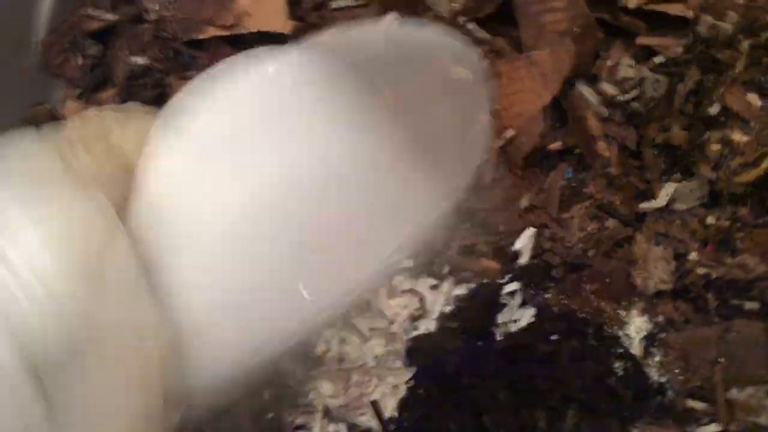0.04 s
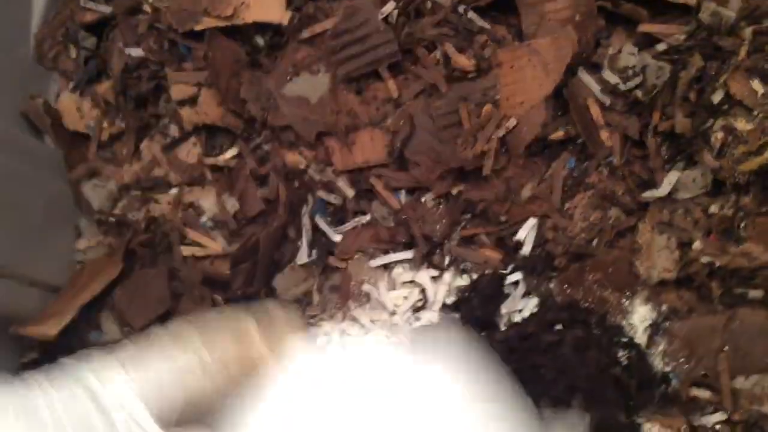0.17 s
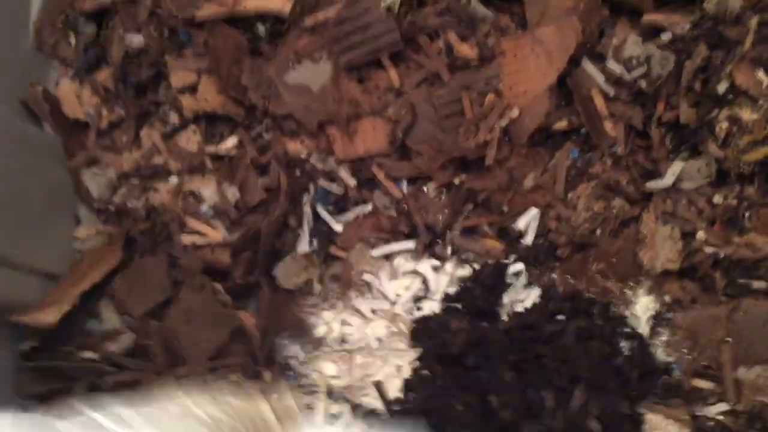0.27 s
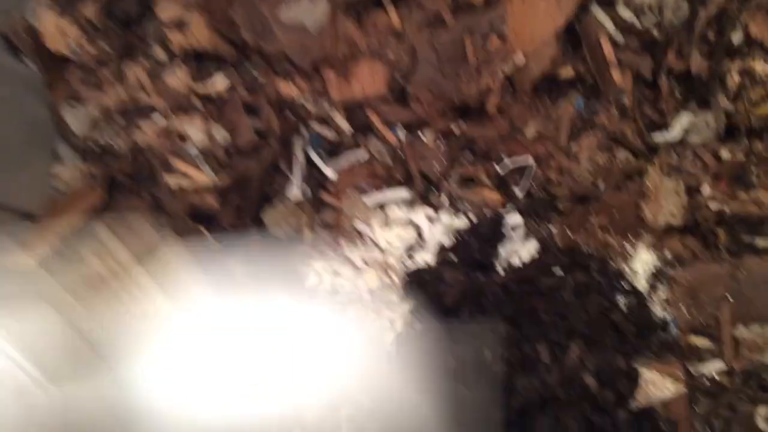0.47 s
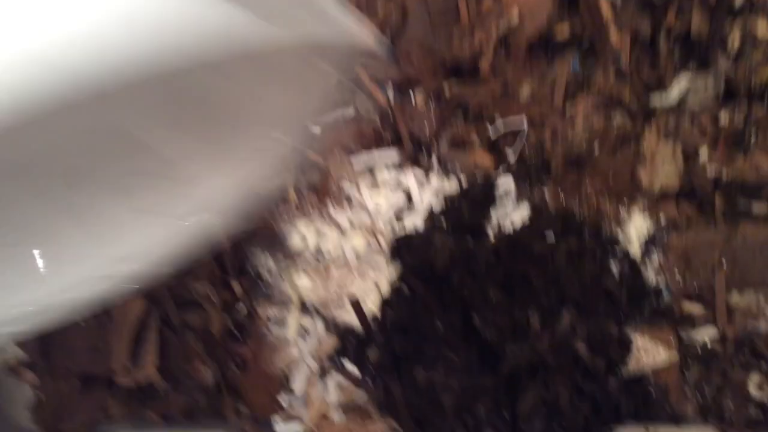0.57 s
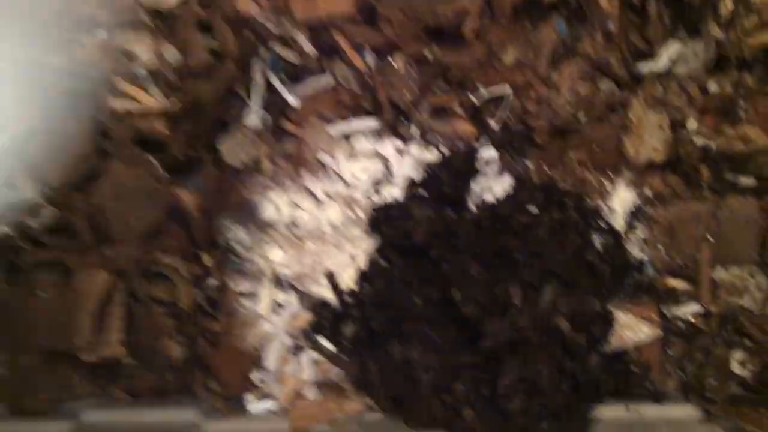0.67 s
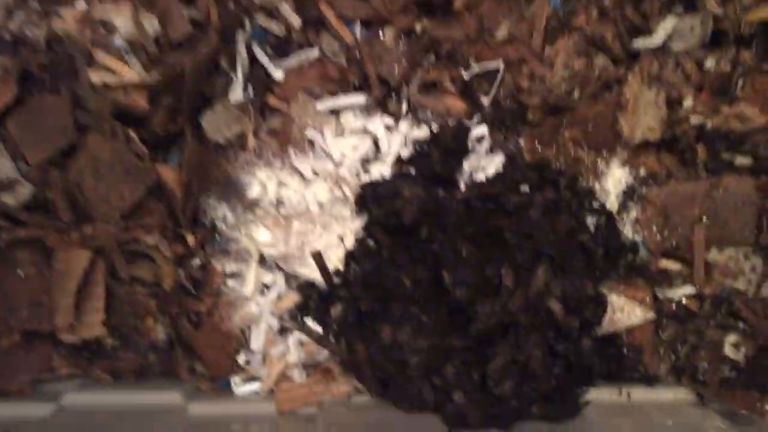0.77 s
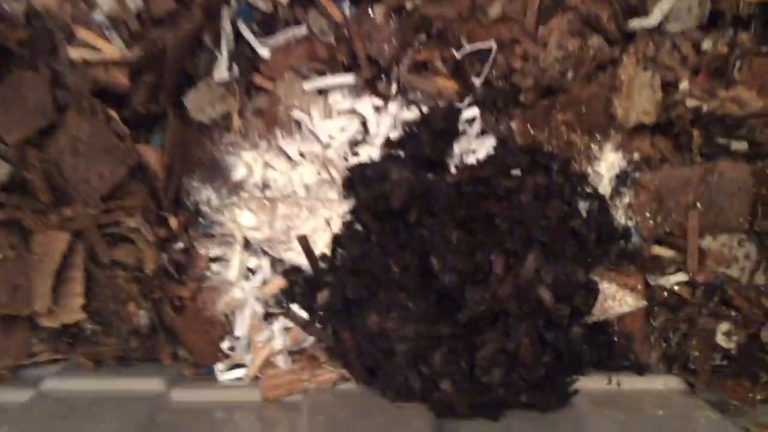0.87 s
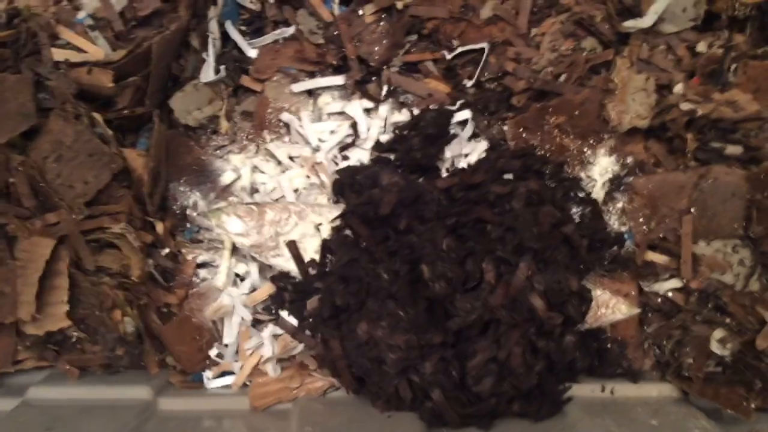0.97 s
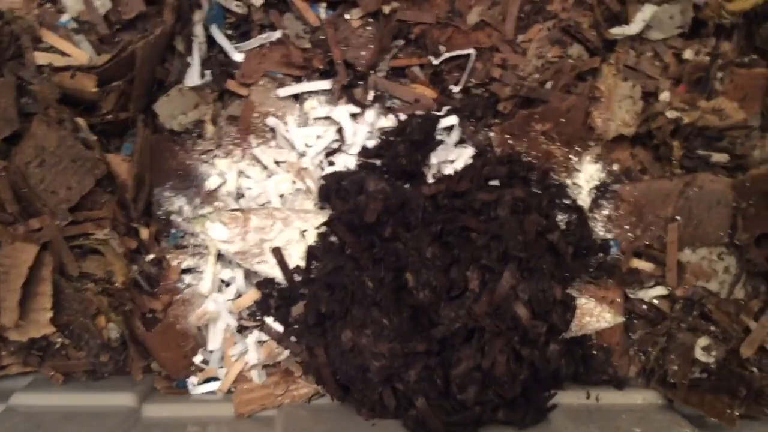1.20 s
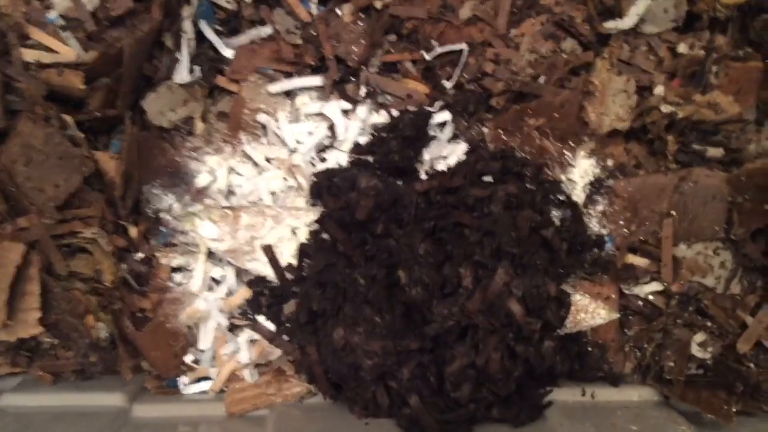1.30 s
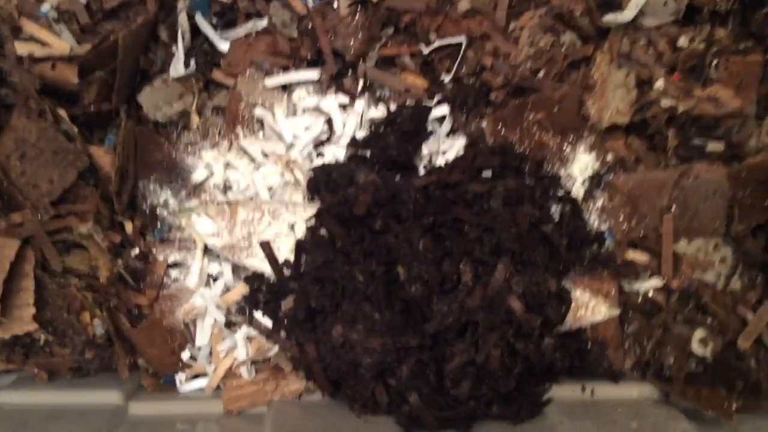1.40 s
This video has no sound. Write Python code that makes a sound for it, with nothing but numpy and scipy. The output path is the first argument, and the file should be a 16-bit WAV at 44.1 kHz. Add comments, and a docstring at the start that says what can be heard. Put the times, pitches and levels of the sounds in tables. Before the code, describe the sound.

Close, hard plastic knocks, three in quick succession, crack and boom through a large bin over faint rustling and hiss; after a short pause the bowl lands more distantly on a hard surface and rattles briefly indoors.

```python
"""A quiet hum, hiss and low rumble (filtered noise) run throughout; gloves and scraps rustle as dense random
grains, first softly on their own. After a faint lead-in a plastic bowl is knocked three times on the rim of a
large bin, close to the microphone, the last knock in two touches: each is a noise crack with decaying bowl
and bin modes. Last, again after a faint lead-in, the bowl is set down on a hard surface, where it bounces:
weaker cracks and modes. A small room answers with an echo of decaying noise bands."""
import sys
import numpy as np
from scipy import signal
from scipy.fft import rfft, irfft
from scipy.io import wavfile

SR = 44100
rng = np.random.default_rng(int(sys.argv[2]) if len(sys.argv) > 2 else 0)


def digitize_waveform(pressure):
    """Quantize a signal to 16-bit integers and store it at the path in sys.argv[1].

    Rows of a 2-D input are taken as channels; values are limited to [-1, 1].
    """
    field = np.atleast_2d(pressure).T
    bounded = np.clip(field, -1, 1)
    quanta = np.round(bounded * 32767).astype(np.int16)
    wavfile.write(sys.argv[1], SR, quanta)


def level_to_linear(level):
    """Convert decibel levels to linear amplitude factors, elementwise."""
    exponent = np.asarray(level, float) / 20
    return 10 ** exponent


N = 63945  # length in samples

# Spectrum of the hum and hiss: [f/Hz, relative level/dB]
HUM_SPECTRUM = [(24, -53), (40, -23.5), (118, -0.5), (231, -23.5), (320, -12.5), (1720, -22), (2700, -25.5),
                (9220, -26), (16000, -43)]
# Level of the low rumble over time: [t/s, level/dB]
RUMBLE_LEVEL = [(0, -50), (0.151, -67), (0.798, -64), (.97, -64), (1.45, -67.5)]
# Swells of the rustle: [middle t/s, full width at 1/e t/s, level/dB]
RUSTLE_SWELLS = [(.01, 0.012, -68.5), (0.1, 0.0021, -54), (.105, .01, -58.5), (0.134, 0.037, -55.5),
                 (0.182, 0.0029, -57.5), (0.201, 0.026, -42), (0.236, 0.025, -42.5), (0.369, 0.06, -53.5),
                 (0.496, .015, -52.5), (0.727, .11, -59.5), (0.798, 0.023, -61), (0.825, 0.019, -51.5),
                 (0.854, 0.031, -66.5), (.89, 0.026, -67), (1.256, .07, -56.5)]
# Spectrum of the rustle: [f/Hz, relative level/dB]
RUSTLE_SPECTRUM = [(710, -38), (1200, -2), (2860, -7.5), (3110, 6), (4750, 0), (5180, -1), (9410, 0.5),
                   (15200, -17.5), (16000, -14)]
# Reverberation time of the room: [f/Hz, t60/s]
ROOM_DECAY = [(60, 0.87), (250, 0.27), (800, 0.45), (2000, 0.38), (5000, 0.33), (10000, 0.3), (16000, 0.22)]
# Strength of the room echo: [f/Hz, level/dB]
ROOM_LEVEL = [(60, -26.5), (250, -15), (800, -11.5), (2000, -13), (5000, -18), (10000, -17), (16000, -19)]
# Knocks of bowl on bin: a faint lead-in just before the first, then three knocks, the last in two touches:
# [t/s, crack level/dB, bin level/dB, bowl level/dB, contact t/ms on the bin,
# spot on the rim (0-1), crack tilt/(dB per octave)]
KNOCKS = [(0.193, -42.5, -15, -49, 3.0, 0, 0.3), (0.2056, -7.5, 1, -16.5, 1.3, .3, -.5),
          (0.3659, -16, -4.5, -21, 1.6, .35, 1.47), (0.5037, -15, -3.5, -16.5, 0.78, 0.29, -0.3),
          (0.5181, -24, -11, -30, 0.61, 0.37, -2.7)]
# Where the bowl is struck, for each row of the knocks: [share of the bowl's rim]
BOWL_SPOTS = [.05, 0.085, .3, .49, .49]
# Spectrum of the rim crack: [f/Hz, relative level/dB]
CRACK_SPECTRUM = [(410, -28.5), (700, -6), (1500, -11.5), (2130, -3.5), (2660, -7.5), (5330, -2),
                  (6480, -8.5), (7590, -5), (12200, -12), (16000, -25)]
# Modes of the bowl held in the hand: [f/Hz, level/dB, late t60/s, half waves round the rim]
BOWL_MODES = [(250, 5.5, 0.093, 0.51), (492.8, -3.5, 0.099, 1.1), (671, -5, .07, 1.3),
              (814, -7, 0.07, 0.43), (809, -9.5, 0.45, 0.26), (848.9, 4.5, .1, 0.12), (890, -5, 0.057, 0.3),
              (1332, -4, .05, 3.3), (2280, -10, .03, 1.5), (3350, -0.5, .06, 1.7), (4297, -8, 0.12, 1.2),
              (5250, -5.5, .03, 1.1)]
# Modes of the bin walls: [f/Hz, level/dB, late t60/s, swell t/ms, half waves along the rim]
BIN_MODES = [(63.8, -12, 0.2, 3.2, 0.47), (93.05, 1.5, 0.29, 12, 0.44), (127.04, -4.5, 0.43, 2, 0.99),
             (157.13, 1.5, 0.36, 4.1, 1.05), (199.5, -5.5, 0.33, 3.1, 2.8), (221, -18.5, 0.54, 2.4, 8.7),
             (276.7, -7, .3, 3, 3.8), (351, -18, 0.15, 5.3, 3.6), (406, -26, 0.6, 3, 5.9)]
# Set-down of the bowl: a faint lead-in, the landing and its bounces:
# [t/s, crack level/dB, ring level/dB, contact t/ms before scaling, crack tilt/(dB per octave)]
SET_DOWN = [(1.093, -50, -36, 2.8, -1), (1.1013, -24.5, -12.5, 0.56, 3.3), (1.119, -39, -20.5, 2.8, -2.5),
            (1.1453, -27, -18, 2.6, 4), (1.167, -43, -20.5, 1.5, 0.5), (1.182, -37, -35, 1.1, -5.5)]
# Spectrum of the set-down crack: [f/Hz, relative level/dB]
TAP_SPECTRUM = [(210, -11.5), (350, 3), (754, -14), (1340, -11.5), (1760, -29.5), (3340, -14.5),
                (4520, -17.5), (5390, -28), (8310, -25.5), (16000, -51.5)]
# Modes of the surface and the free bowl: [f/Hz, level/dB, late t60/s]
SURFACE_MODES = [(80, -15, 0.27), (117.8, -14, 0.46), (174.3, 0.5, 0.17), (219.2, -2.5, 0.22),
                 (311.5, -16, 0.32), (400, -20.5, 0.35), (467.3, -22, 0.23), (722, -26, 0.134),
                 (851, -17.5, 0.15), (1182.4, -9, 0.066), (2369, -15, 0.11), (3130, -17.5, 0.077),
                 (3380, -7, 0.13), (3900, -43, .08), (4524, -12, 0.081)]

HUM_DB = -64
RUMBLE_HZ, RUMBLE_WIDTH_HZ = 85, 72  # width of each of two equal resonators
GRAINS_PER_S, GRAIN_SPREAD_DB = 15000, 1.2
ROOM_LAG_S = 0.012  # time constant of the echo's onset
CRACK_HOLD_S, CRACK_T60_S = 0.0023, 0.034
TAP_HOLD_S, TAP_T60_S = 0.003, 0.066
CRACK_TICK_DB, TAP_TICK_DB, TICK_T60_S = 2, -6, 0.0054  # short extra burst at the start of each crack
EARLY_T60_S, LATE_DB = 0.083, -8  # extra early loss, and level of the later ring
WAVER_PER_S, WAVER_CYCLES = 30, 0.14  # phase steps per second, and their spread at 250 Hz
SURFACE_SWELL_CYCLES = 0.44  # onset time constant in periods of the mode
SET_DOWN_ROOM_DB = 12.5  # farther off, so more of the room
MIC_LOW_HZ, CLIP_LEVEL = 36.4, 1.0


def across(table, hz):
    """Linear interpolation of a (f/Hz, value) table on a log-frequency axis."""
    rows = np.array(table, float)
    return np.interp(np.log(np.maximum(hz, 1)), np.log(rows[:, 0]), rows[:, 1])


def coloured(x, table):
    """Spectral shaping: multiply the spectrum of x by the table, then normalise to rms 1."""
    gain = level_to_linear(across(table, np.fft.rfftfreq(len(x), 1 / SR)))
    y = irfft(rfft(x) * gain, len(x))
    return y / np.sqrt(np.mean(y ** 2))


def background():
    """Filtered noise: steady shaped hum and hiss, plus resonant low rumble that falls from its first level."""
    hum = level_to_linear(HUM_DB) * coloured(rng.standard_normal(N), HUM_SPECTRUM)
    b, a = signal.iirpeak(RUMBLE_HZ, RUMBLE_HZ / RUMBLE_WIDTH_HZ, fs=SR)
    rumble = signal.lfilter(b, a, signal.lfilter(b, a, rng.standard_normal(N)))
    times, levels = np.array(RUMBLE_LEVEL).T
    return hum + rumble / rumble.std() * level_to_linear(np.interp(np.arange(N) / SR, times, levels))


def rustles():
    """Shot noise: dense random impulses of uneven strength, shaped in spectrum and in Gaussian swells."""
    t = np.arange(N) / SR
    present = rng.random(N) < GRAINS_PER_S / SR
    strength = level_to_linear(GRAIN_SPREAD_DB * rng.exponential(size=N))
    grains = present * rng.standard_normal(N) * strength
    swell = sum(level_to_linear(db) * np.exp(-(2 * (t - s) / length) ** 2) for s, length, db in RUSTLE_SWELLS)
    return coloured(grains, RUSTLE_SPECTRUM) * swell


def room(x):
    """Diffuse reverberation: convolution with half-octave noise bands, each decaying at its own rate."""
    t, hz = np.arange(SR // 2) / SR, np.fft.rfftfreq(SR // 2, 1 / SR)
    noise, echo = rfft(rng.standard_normal(len(t))), 0
    for mid_hz in 45 * 2 ** (np.arange(18) / 2):
        octaves = np.log2(np.maximum(hz, 1) / mid_hz)
        window = np.cos(np.pi * np.clip(octaves, -0.5, 0.5)) ** 2
        band = irfft(noise * window, len(t))
        t60 = across(ROOM_DECAY, mid_hz)
        energy_scale = np.sqrt(2 * np.log(1000) / t60 / SR)  # offsets the greater energy of a long decay
        echo = echo + band * level_to_linear(across(ROOM_LEVEL, mid_hz) - 60 * t / t60) * energy_scale
    onset = 1 - np.exp(-t / ROOM_LAG_S)
    return signal.fftconvolve(x, echo * onset)[:N]


def crack(start_s, table, hold_s, t60_s, tilt_db, tick_db):
    """Chattering contact: a burst of shaped noise that holds briefly, then decays exponentially."""
    t = np.arange(N) / SR - start_s
    tilted = [(hz, db + tilt_db * np.log2(hz / 4000)) for hz, db in table]
    noise = coloured(rng.standard_normal(N), tilted)
    body = level_to_linear(-60 * np.clip(t - hold_s, 0, 1) / t60_s)
    tick = level_to_linear(tick_db - 60 * np.clip(t, 0, 1) / TICK_T60_S)
    return noise * (t > 0) * (body + tick)


def ring(start_s, modes, contact_ms, swell_ms=None, shape=1):
    """Modal superposition: decaying sinusoids of wavering phase; longer contact weakens the high modes."""
    rows, t = np.array(modes, float), np.arange(int(0.6 * SR)) / SR
    hz, level_db, t60_s = rows[:, :1], rows[:, 1], rows[:, 2:3]
    sign = (-1) ** np.arange(1, len(rows) + 1)  # neighbouring modes in opposite sign
    gain = level_to_linear(level_db) / (1 + (rows[:, 0] * contact_ms / 1000) ** 2) * shape * sign
    # the phase of each mode follows its own random walk
    walks = np.cumsum(rng.standard_normal((len(rows), 60)), axis=1)
    walks = walks - walks[:, :1]
    waver = np.array([np.interp(t * WAVER_PER_S, np.arange(1, 61), walk, left=0) for walk in walks])
    cycles = hz * t + WAVER_CYCLES * waver * (hz / 250) ** 0.4
    out = np.sin(2 * np.pi * cycles) * level_to_linear(-60 * t / t60_s)
    # a mode first loses energy fast, then rings on lower
    out = out * (level_to_linear(-60 * t / EARLY_T60_S) + level_to_linear(LATE_DB))
    if swell_ms is not None:
        out = out * (1 - np.exp(-1000 * t / swell_ms[:, None]))
    return np.concatenate([np.zeros(int(start_s * SR)), gain @ out, np.zeros(N)])[:N]


def mode_shape(half_waves, spot):
    """Standing-wave principle: a blow drives each mode by its displacement at the struck spot."""
    return np.abs(np.cos(np.pi * half_waves * spot))


def knocks():
    """Impact excitation: the rim cracks, the bowl rings short, the bin walls swell and boom."""
    out, walls, bowl = np.zeros(N), np.array(BIN_MODES, float), np.array(BOWL_MODES, float)
    for row, bowl_spot in zip(KNOCKS, BOWL_SPOTS):
        s, crack_db, bin_db, bowl_db, contact_ms, bin_spot, tilt_db = row
        rim = crack(s, CRACK_SPECTRUM, CRACK_HOLD_S, CRACK_T60_S, tilt_db, CRACK_TICK_DB)
        bowl_shape = mode_shape(bowl[:, 3], bowl_spot)
        bowl_ring = ring(s, BOWL_MODES, 0.02 * contact_ms, None, bowl_shape)
        bin_shape = mode_shape(walls[:, 4], bin_spot)
        boom = ring(s, BIN_MODES, contact_ms, walls[:, 3], bin_shape)
        out = out + level_to_linear(crack_db) * rim + level_to_linear(bowl_db) * bowl_ring + level_to_linear(bin_db) * boom
    return out


def set_down():
    """Impact excitation: after a faint lead-in the bowl lands and bounces, with cracks and ringing modes."""
    out = np.zeros(N)
    swell_ms = 1000 * SURFACE_SWELL_CYCLES / np.array(SURFACE_MODES)[:, 0]
    for s, crack_db, ring_db, contact_ms, tilt_db in SET_DOWN:
        tap = crack(s, TAP_SPECTRUM, TAP_HOLD_S, TAP_T60_S, tilt_db, TAP_TICK_DB)
        surface = ring(s, SURFACE_MODES, 0.37 * contact_ms, swell_ms)
        out = out + level_to_linear(crack_db) * tap + level_to_linear(ring_db) * surface
    return out


def scene():
    """Superposition of direct sound, room echo and background, as one channel."""
    near = knocks() + rustles()
    far = set_down()
    echo = room(near + level_to_linear(SET_DOWN_ROOM_DB) * far)
    return (near + far + echo + background())[None]


def low_pass(x):
    """Removes everything above the highest recorded frequency."""
    return signal.sosfilt(signal.butter(12, 16400, fs=SR, output="sos"), x)


def record(dry):
    """High-pass and saturation: the microphone drops the deepest bass; the input clips at full scale."""
    high_pass = signal.butter(2, MIC_LOW_HZ, "high", fs=SR, output="sos")
    heard = signal.sosfilt(high_pass, dry)
    mix = np.clip(heard, -CLIP_LEVEL, CLIP_LEVEL)
    return low_pass(mix)


dry = scene()
out = record(dry)
digitize_waveform(out)
```